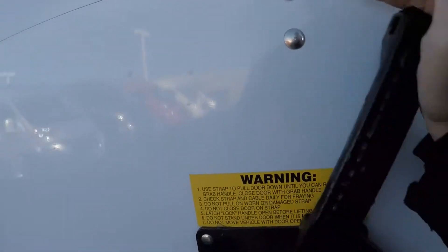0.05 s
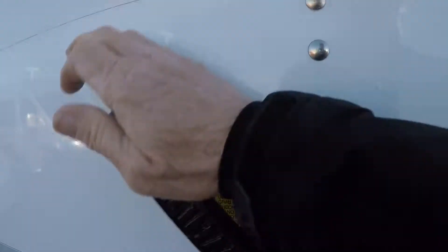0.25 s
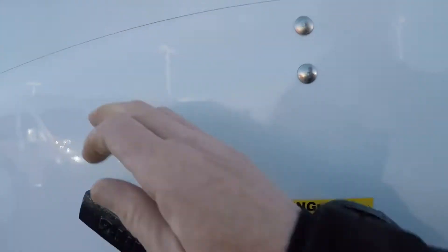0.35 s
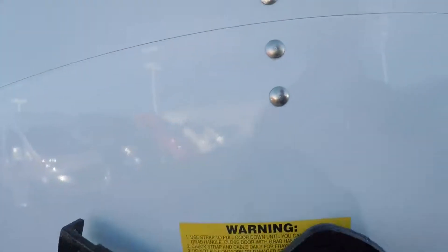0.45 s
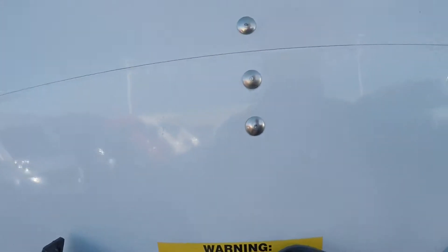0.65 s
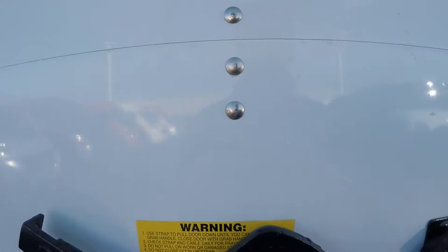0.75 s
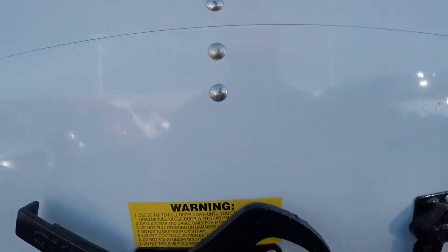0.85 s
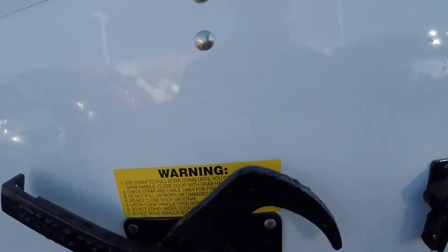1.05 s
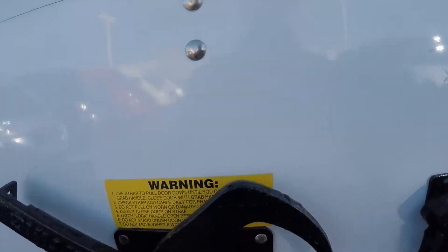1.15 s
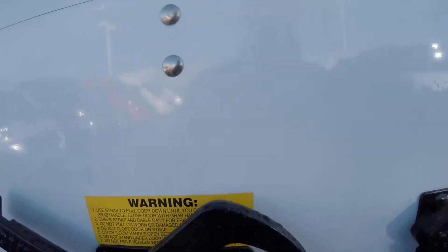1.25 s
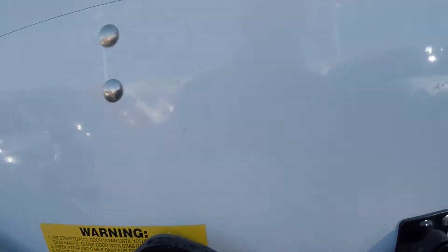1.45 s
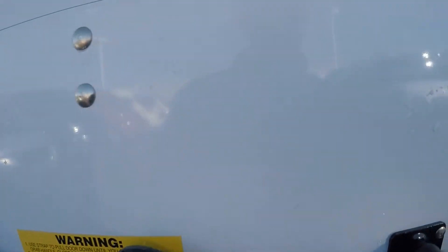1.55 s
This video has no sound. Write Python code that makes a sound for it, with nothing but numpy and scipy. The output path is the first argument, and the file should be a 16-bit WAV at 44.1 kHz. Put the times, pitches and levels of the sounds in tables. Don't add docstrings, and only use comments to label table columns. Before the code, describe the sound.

Close to a small recorder outdoors, a metal door latch knocks, bangs hard and rattles to rest as the door booms. A passing vehicle fades over low rumble, then the handle ticks and clothing rustles.

```python
import sys
import numpy as np
from scipy import signal
from scipy.io import wavfile
from scipy.ndimage import uniform_filter1d

SR = 44100
rng = np.random.default_rng(int(sys.argv[2]) if len(sys.argv) > 2 else 0)


def volts(x):
    e = np.asarray(x, float) / 20
    return 10 ** e


def wav_out(sig):
    wavfile.write(sys.argv[1], SR, np.round(np.clip(np.atleast_2d(sig).T, -1, 1) * 32767).astype(np.int16))


N = 70560


def curve_db(points, hz, fall_db=10.0):
    f, level = np.transpose(points)
    octaves_below = np.maximum(np.log2(f[0] / (hz + 1)), 0)
    octaves_above = np.maximum(np.log2((hz + 1) / f[-1]), 0)
    return np.interp(np.log(hz + 1), np.log(f), level) - fall_db * (octaves_below + octaves_above)


def along(rows, column=1):
    rows = np.asarray(rows)
    return np.interp(np.arange(N) / SR, rows[:, 0], rows[:, column])


def evened(x):
    return x / np.sqrt(np.mean(x ** 2) + 1e-20)


def peaked(x):
    return x / abs(x).max()


def add(mix, s, sound):
    part = mix[round(s * SR):][:len(sound)]
    part += sound[:len(part)]


def noise(colour, patchy_db, size=1024):
    hop = size // 4
    a, b, patches = rng.standard_normal((N // hop + 5, size // 2 + 1, 3)).T
    for axis in (0, 1):
        patches = uniform_filter1d(patches, size=8, axis=axis)
    level = curve_db(colour, np.fft.rfftfreq(size, 1 / SR))[:, None] + patchy_db * evened(patches)
    return evened(signal.istft((a + 1j * b) * volts(level), nperseg=size, noverlap=size - hop)[1][:N])


def ring(hz, db, t60, phase, length, late=0):
    rise_s = 0.00019
    t = np.arange(0, length, 1 / SR) - (late + 0 * hz)[:, None]
    fade = np.exp(-np.log(1000) * t / t60[:, None]) * np.clip(t / rise_s, 0, 1)
    return volts(db) @ (fade * np.sin(2 * np.pi * (hz[:, None] * t + phase[:, None])))


def street():
    # t/s, tyre roar level/dB, rumble level/dB
    passing = [(0, -38.5, -41), (.3, -43, -39), (.6, -39, -42.5), (.78, -43, -49.5), (.95, -47.5, -48.5),
               (1.1, -47.5, -44), (1.32, -52, -43.5), (1.6, -50, -42.5)]
    # f/Hz, level/dB per Hz
    roar_colour = [(250, -10.5), (520, -9.5), (680, 0), (1100, -2.5), (2000, -1.5), (3100, -14),
                   (7000, -60)]
    rumble_colour = [(22, -3), (38, -3), (128, -7.5), (200, -22), (330, -27.5)]
    air_colour = [(2500, -0.5), (3300, -9), (3850, -0.5), (6000, -13), (14700, -23.5)]
    # t/s, level/dB
    air_fade = [(.25, -10), (.7, -19)]
    drone_hz, half_width_hz, drone_db, fade_db_per_s = 248, 63, -41, 30
    hump = [(drone_hz - half_width_hz, -12), (drone_hz, 0), (drone_hz + half_width_hz, -12)]
    drone = volts(drone_db - fade_db_per_s * np.arange(N) / SR) * noise(hump, 2.8, size=2048)
    roar = volts(along(passing) + 2.0) * noise(roar_colour, 1.2)
    rumble = volts(along(passing, column=2) + 4.0) * noise(rumble_colour, 1.2, size=2048)
    air = volts(along(air_fade) - 41) * noise(air_colour, 0.71)
    return roar + rumble + air + drone


def singing_part(modes, blows):
    out = np.zeros(N)
    hz, level, t60 = np.transpose(modes)
    for s, db, held_s in blows:
        note = ring(hz, level, t60, 0 * hz, .15)
        let_ring = np.clip((held_s - np.arange(len(note)) / SR) / 0.013, 0, 1)
        add(out, s, volts(db) * note * let_ring)
    return out


def bar():
    # f/Hz, level/dB, t60/s (time to fade by 60 dB)
    bar_notes = [(8140, -48.5, 0.54), (3750, -49, 0.81)]
    # t/s, level/dB, time until damped/s
    bar_blows = [
        (.0005, -7.5, 0.11),
        (0.135, 0.5, 0.12),
        (0.283, -11, 0.054),
    ]
    return singing_part(bar_notes, bar_blows)


def latch():
    # t/s, peak level/dB, strongest f/Hz, t60/s, treble tilt above 3 kHz/steps of 2 dB per
    clacks = [(0.132, -7, 1050, 0.039, 1), (.1345, -4, 2000, 0.011, -0.5),
              (0.2811, -11.5, 970, 0.034, -3.5), (.284, -18, 2250, 0.026, -10), (0.305, -38, 5500, 0.03, 7),
              (0.3233, -9.5, 4036, 0.061, -2.5), (.325, -13, 4620, 0.036, -1.5),
              (.339, -12, 1400, 0.031, -4), (0.348, -15.5, 4500, 0.02, 0.5), (.352, -11, 1880, 0.0087, -13),
              (0.3741, 6, 2260, 0.032, -0.5), (.378, -0.5, 1645, 0.094, -1), (0.396, -14, 4000, 0.017, 2),
              (.407, -8, 2230, 0.045, -1.5), (.4272, 2, 582, 0.04, -6.5), (0.4296, -0.5, 4254, 0.048, 2.5),
              (.446, -7.5, 1727, 0.052, 0), (.466, -12.5, 1694, 0.14, -2.5), (.477, -14, 2410, 0.11, -9),
              (.492, -18.5, 1307, 0.17, -4), (.9945, -22.5, 1190, 0.015, 3.5)]
    # f/Hz, level/dB per Hz
    clack_colour = [(420, -3.5), (700, -3.5), (1300, -5.5), (2200, 0), (3000, -9), (4200, -8), (7000, -16),
                    (15000, -40.5)]
    count, low_hz, high_hz = 240, 380, 15500
    focus_db, focus_oct, chatter_s, treble_damp, clack_db = 5, 0.45, .0015, 0.43, -3
    tail_db, tail_stretch = -18.5, 6.8
    note_db, note_stretch = -12, 0.82
    out = np.zeros(N)
    luck = rng.random((len(clacks), 4, count))
    for (s, db, main_hz, t60, tilt_db), (u, v, w, late) in zip(clacks, luck):
        t60 = max(t60, .01)
        hz = low_hz * (high_hz / low_hz) ** ((np.arange(count) + u) / count)
        level = curve_db(clack_colour, hz) + 10 * np.log10(hz) - 3.2 * w
        level += 2 * tilt_db * np.maximum(np.log2(hz / 3000), 0)
        level += focus_db * np.exp(-(np.log2(hz / main_hz) / focus_oct) ** 2)
        fade_s = t60 * (hz / 2000) ** -treble_damp * (0.64 + 0.96 * v)
        chatter = -chatter_s * np.log(1 - late) * late
        body = peaked(ring(hz, level, fade_s, v * 7 % 1, 0.077, chatter))
        t = np.arange(len(body)) / SR
        note = volts(note_db - 60 * t / t60 / note_stretch) * np.sin(2 * np.pi * main_hz * t)
        body += note * np.minimum(t / 0.0014, 1)
        tail = peaked(ring(hz[::3], level[::3], fade_s[::3] * tail_stretch, w[::3], 0.14))
        scale = volts(db + clack_db) / abs(body).max()
        body_fade = np.cos(np.linspace(0, np.pi / 2, len(body))) ** .5
        tail_swell = np.sin(np.pi * np.linspace(0, 1, len(tail)) ** 1.8)
        add(out, s, scale * body * body_fade)
        add(out, s, scale * volts(tail_db) * tail * tail_swell)
    return out


def rings():
    # t/s, peak level/dB, f/Hz, t60/s
    lone_tones = [(.1322, -3, 917, .014), (.1335, -15, 688, 0.056), (0.135, -21, 1710, 0.051),
                  (0.1342, -11, 2494, .03), (.135, -16.5, 3790, 0.022), (.138, -35.5, 4140, 0.11),
                  (.139, -17, 1160, 0.044), (.2815, -23.5, 2150, 0.044), (0.282, -29, 3580, .02),
                  (0.2816, -26.5, 6430, 0.01), (0.3237, -8, 3940, 0.024), (0.3237, -21.5, 7250, 0.011),
                  (0.3259, -16.5, 2519, 0.028), (0.328, -17.5, 4300, 0.022), (.331, -25, 3740, 0.028),
                  (0.323, -26.5, 393, 0.12), (0.345, -23, 1350, .025), (.349, -28, 4480, .015),
                  (0.353, -12, 1870, 0.017), (0.3756, -6.5, 1445, 0.087), (.3755, -7.5, 4960, .025),
                  (.376, -16, 3860, 0.059), (0.377, -11, 3104, 0.035), (.382, 0.5, 62.9, 0.094),
                  (.387, -8, 242, 0.095), (.396, -12, 4180, 0.012), (.428, -12.5, 719, 0.13),
                  (.429, -13, 1732, 0.066), (0.43, -13, 3810, 0.032), (0.424, -18, 59, 0.38),
                  (0.459, -16, 254.6, 0.08), (.459, -18, 398, 0.043), (.497, -25.5, 221.3, 0.32),
                  (.51, -20, 55, 0.21), (.5, -40, 162, 0.79), (0.134, -18, 290, 0.054),
                  (.136, -11.5, 2073, 0.035), (0.4273, -12, 1120, .05), (0.473, -21.5, 160, 0.085),
                  (0.323, -17, 4800, .02), (.304, -37, 4000, 0.038), (.53, -29.5, 221, 0.26),
                  (0.4284, -15.5, 5276, 0.036), (0.134, -19, 550, 0.026)]
    rise_turns = 0.63
    out = np.zeros(N)
    t = np.arange(0, .3, 1 / SR)
    for s, db, hz, t60 in lone_tones:
        tone = volts(db - 60 * t / max(t60, .005)) * np.sin(2 * np.pi * hz * t)
        add(out, s, tone * np.minimum(t * hz / rise_turns, 1) * (1 - t / t[-1]))
    return out


def panel():
    # t/s, peak level/dB, tilt/steps of 2.76 dB per octave
    thumps = [(0.134, -22, -3.5), (0.262, -19, 6.5), (.377, 2, 0), (.383, -0.5, 1), (.395, -1, -0.5),
              (0.409, -12, 0.5), (0.427, -5, -0.5), (0.458, -7, 4), (0.476, -10.5, 0.5), (0.521, -15.5, 0),
              (0.88, -42, 2)]
    # f/Hz, level/dB, t60/s
    sheet_tones = [(60.2, -8.5, 0.096), (80, -0.5, 0.11), (122.6, 1, 0.083), (166.6, -9.5, 0.2),
                   (227, -11, 0.27), (255.8, -4.5, 0.105), (286, -3.5, 0.084), (351, -12, 0.126),
                   (401.3, -22, 0.21)]
    thump_db, rise_s = -4.5, 0.0027
    sag = 0.28
    out = np.zeros(N)
    hz, level, t60 = np.transpose(sheet_tones)
    t = np.arange(0, .4, 1 / SR)
    for (s, db, tilt_db), u in zip(thumps, rng.random((len(thumps), len(sheet_tones)))):
        turns = (hz * (.96 + 0.088 * u))[:, None] * t * (1 - sag * t * 100 / hz[:, None])
        tones = volts(-60 * t / t60[:, None]) * np.sin(2 * np.pi * turns)
        boom = volts(level - 10.8 * u + 2.76 * tilt_db * np.log2(hz / 150)) @ tones
        add(out, s, volts(db + thump_db) * peaked(boom * np.minimum(t / rise_s, 1)))
    return out


def pin():
    # f/Hz, level/dB, t60/s
    pin_notes = [(13600, -63, .15), (10200, -63, .06), (11510, -66, .12)]
    # t/s, level/dB, time until damped/s
    pin_blows = [
        (.432, 7, .05),
        (.478, -2, .025),
    ]
    return singing_part(pin_notes, pin_blows)


def tick(db, hz, t60, wide, u, v):
    spread = np.linspace(-2.2, 3.2, len(u)) + 0.32 * u
    snap_hz = np.minimum(hz * 2 ** (0.34 * wide * spread), 15000)
    snap = peaked(ring(snap_hz, -3. * spread ** 2, t60 * (.5 + u), 0.34 * wide * v, 0.067))
    t = np.arange(len(snap)) / SR
    note = volts(-7.5 - 60 * t / (1.16 * t60)) * np.sin(2 * np.pi * hz * t)
    return volts(db) * peaked(snap + note)


def ticks():
    # t/s, peak level/dB, f/Hz
    snaps = [(0.9116, -37, 4500), (0.96, -34.5, 4960), (0.9947, -37.5, 7660), (1.003, -25.5, 4800),
             (1.0124, -25, 3770), (1.033, -21, 4670), (1.0416, -24, 4470), (1.06, -21, 4900),
             (1.069, -34, 4480), (1.104, -29, 4500), (1.1966, -27, 5100), (1.2094, -20, 4330),
             (1.241, -21.5, 4530), (1.256, -24.5, 4230), (1.2806, -20.5, 4120), (1.307, -28.5, 2780),
             (1.342, -33, 3240), (1.353, -43, 5440), (1.369, -29.5, 4500), (1.4195, -17.5, 4720),
             (1.425, -25, 2710), (1.444, -23, 3100), (1.47, -22, 5500), (1.496, -31, 3500),
             (1.5681, -18, 3440), (1.578, -18.5, 5700), (1.5876, -14.5, 3410), (1.595, -21, 3100),
             (1.597, -18.5, 6430), (1.227, -23.5, 2920), (1.4, -25, 3040), (1.452, -30, 3040)]
    swing_s, period_s, taps = .7145, .0406, 5
    swing_db, growth_db, swing_hz, swing_t60_s = -51.5, 2.5, 5320, 0.039
    out = np.zeros(N)
    luck = rng.random((40, 2, 24))
    for k in range(taps):
        tap = tick(swing_db + growth_db * k, swing_hz, swing_t60_s, 1.22, *luck[-1 - k])
        add(out, swing_s + k * period_s, tap)
    for (s, db, hz), (u, v) in zip(snaps, luck):
        add(out, s, tick(db - 1, hz, 0.011, 0.97, u, v))
    return out


def rustle():
    # f/Hz, level/dB per Hz
    rub_colour = [(2100, -26), (2800, -3), (3700, -5.5), (5000, -1.5), (8000, -13), (14600, -41.5)]
    # peak t/s, width/s, peak level/dB, favoured f/Hz
    strokes = [(0.919, 0.013, -49.5, 4800), (.98, 0.046, -47, 4070), (1.048, 0.033, -34.5, 4840),
               (1.102, 0.019, -38.5, 4600), (1.14, 0.048, -46.5, 4400), (1.185, 0.039, -39.5, 4150),
               (1.216, 0.019, -39, 3200), (1.253, 0.023, -40.5, 4270), (1.277, 0.012, -40, 2880),
               (1.35, 0.026, -50, 4200), (1.392, 0.038, -39, 3900), (1.43, 0.021, -37.5, 2760),
               (1.454, 0.023, -33.5, 3070), (1.478, 0.013, -40, 5200), (1.503, 0.014, -38.5, 4270),
               (1.535, 0.035, -47, 4460), (1.569, 0.0072, -30.5, 5400), (1.592, 0.012, -34, 3180)]
    snaps_per_s, snap_spread_db, rub_db, swish_db = 7700, 2.5, -2, -9.5
    grip_db, grip_oct = 3, 0.3
    clump = volts(3.2 * evened(uniform_filter1d(rng.standard_normal(N), size=150)))
    strength = volts(snap_spread_db * np.minimum(rng.exponential(1, N), 5))
    hits = strength * (rng.random(N) < snaps_per_s / SR) * clump
    kind = rng.integers(0, 30, N)
    crackle = np.zeros(N)
    t = np.arange(0, .006, 1 / SR)
    for k, hz in enumerate(np.geomspace(2000, 15000, num=30)):
        shape = hz * t * np.exp(-t * hz / 0.92)
        snap = volts(curve_db(rub_colour, hz)) * hz * shape * np.sin(2 * np.pi * hz * t)
        crackle += signal.oaconvolve(hits * (kind == k), snap)[:N]

    now = np.arange(N) / SR
    push = []
    for s, width, db, _ in strokes:
        away = abs((now - s) / width * np.where(now < s, 1.3, .8))
        push.append(volts(2 * db) * np.exp(-2.5 * away ** 1.64) + 1e-30)
    push = np.array(push)
    effort = np.sqrt(push.sum(0))
    centre_hz = np.transpose(strokes)[-1] @ push / push.sum(0)

    local_level = np.sqrt(uniform_filter1d(crackle ** 2, size=2000) + 1e-12)
    rub = crackle / local_level + volts(swish_db) * noise(rub_colour, 0.92, size=256)
    hz, at, z = signal.stft(rub, SR, nperseg=256, noverlap=192)
    octaves_off = np.log2((hz[:, None] + 1) / np.interp(at, now, centre_hz))
    z = z * volts(grip_db * np.exp(-(octaves_off / grip_oct) ** 2))
    return effort * volts(rub_db) * evened(signal.istft(z, SR, nperseg=256, noverlap=192)[1][:N])


def scene():
    return (street() + bar() + latch() + rings() + panel() + pin() + ticks() + rustle())[None]


def top_cut(x):
    return signal.sosfilt(signal.butter(12, 16520, fs=SR, output="sos"), x)


def record(dry):
    ceiling, mic_top_hz = .97, 15600
    clipped = dry / (1 + abs(dry / ceiling) ** 4) ** (1 / 4)
    low_pass = signal.firwin(129, mic_top_hz, window=("kaiser", 6), fs=SR)
    return top_cut(signal.oaconvolve(clipped, low_pass[None], "same"))


dry = scene()
out = record(dry)
wav_out(out)
```